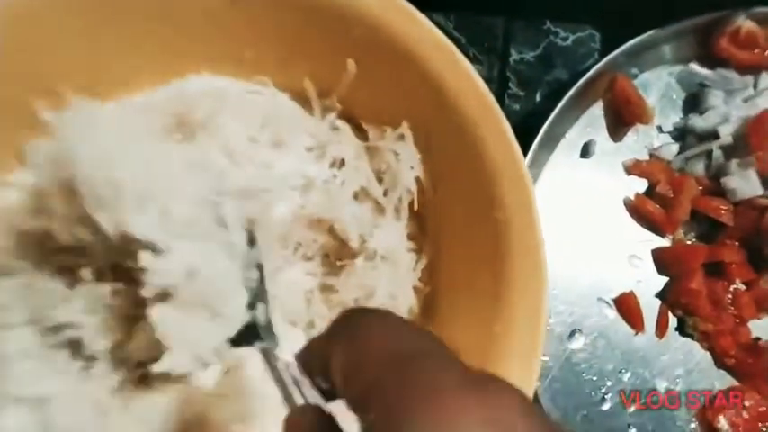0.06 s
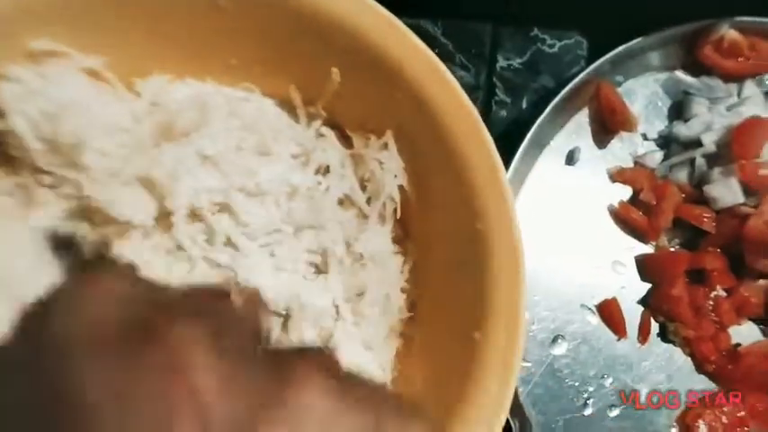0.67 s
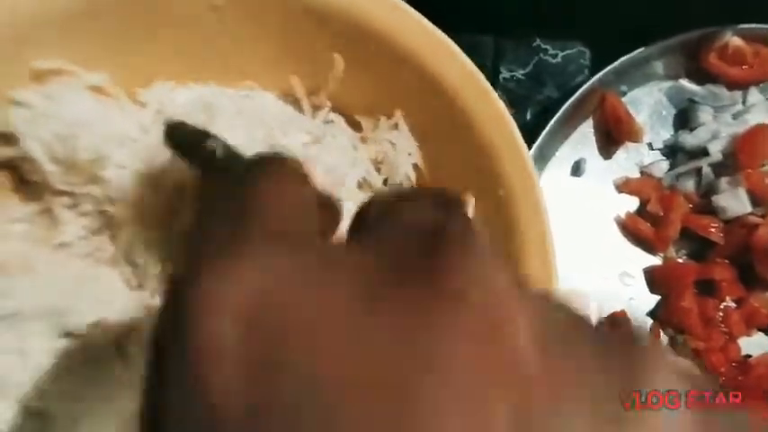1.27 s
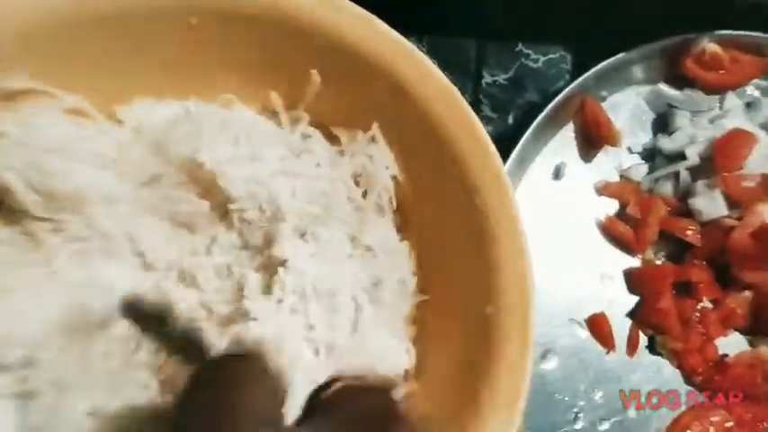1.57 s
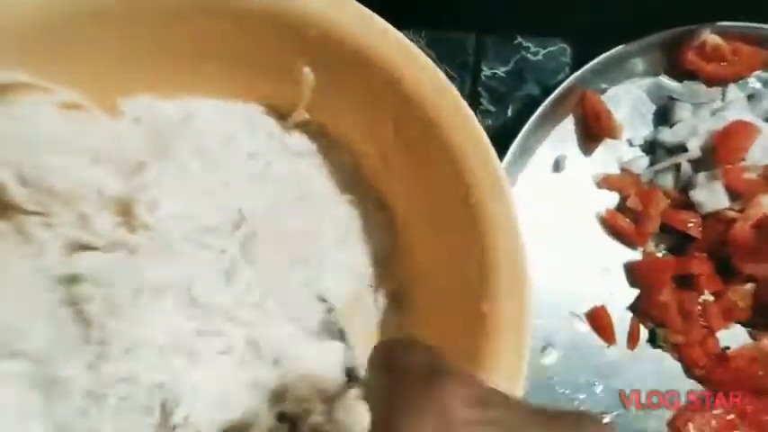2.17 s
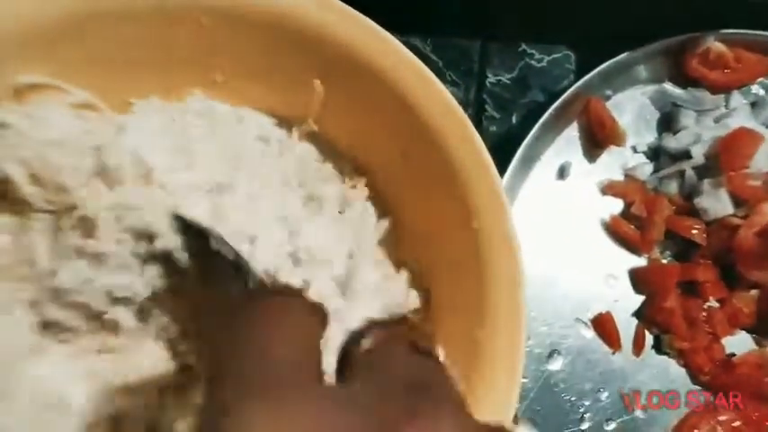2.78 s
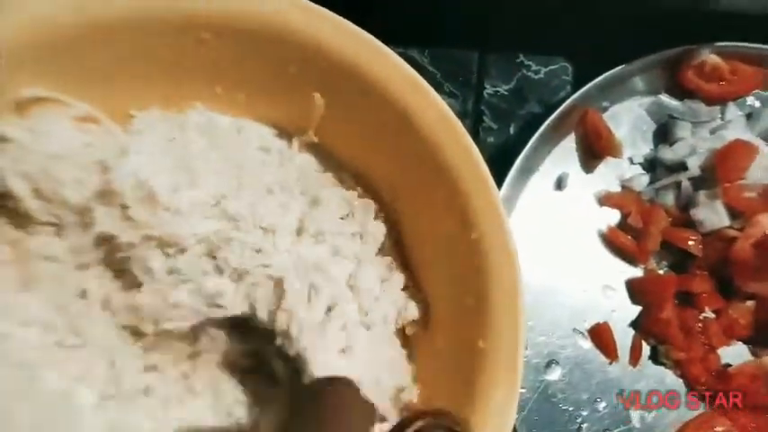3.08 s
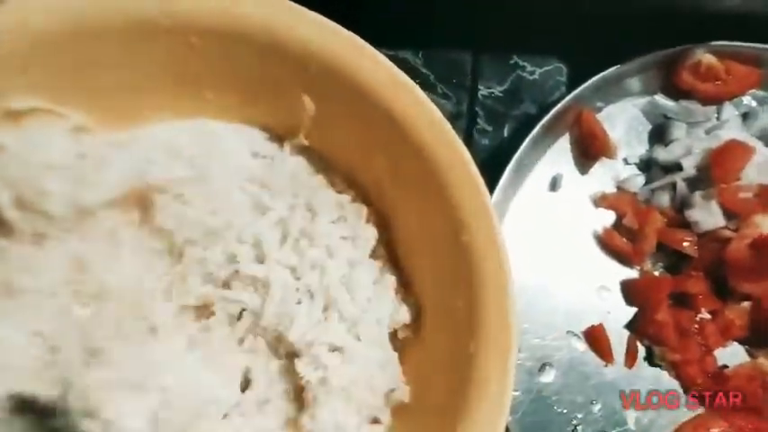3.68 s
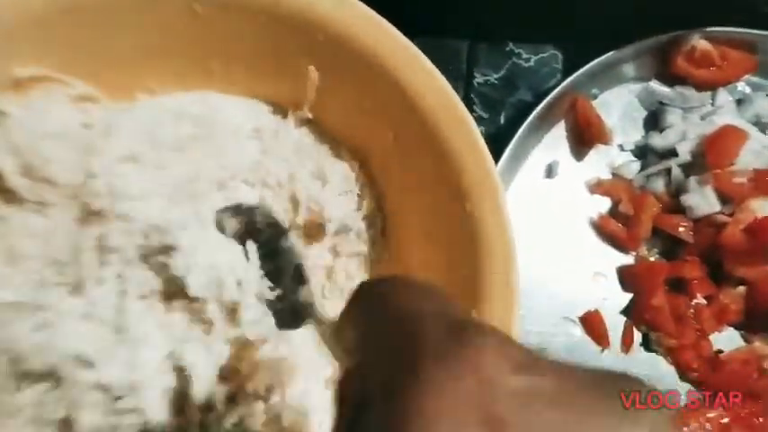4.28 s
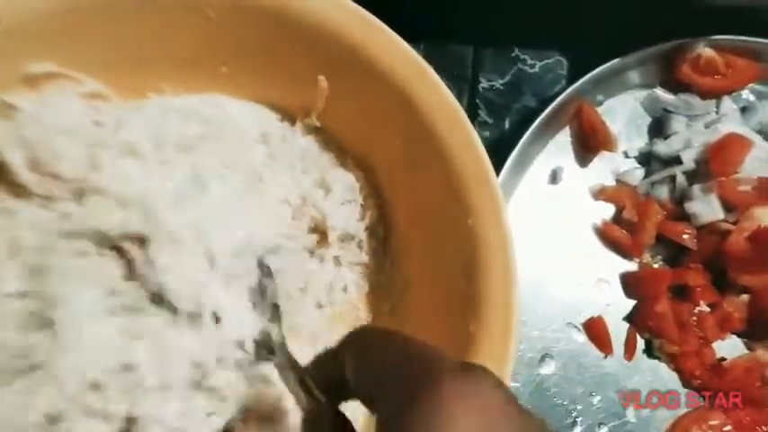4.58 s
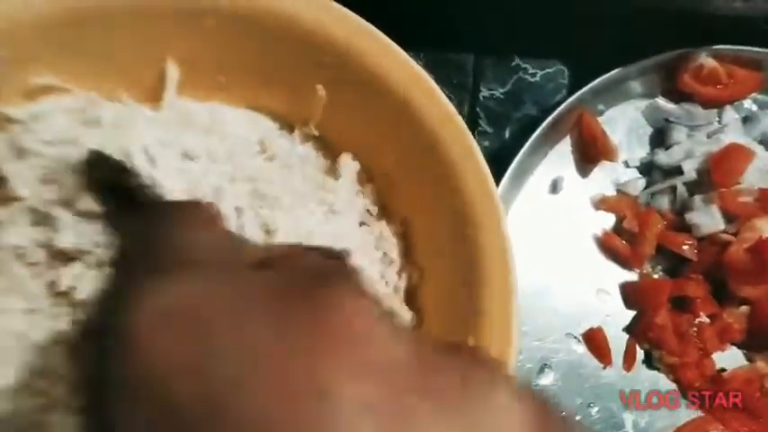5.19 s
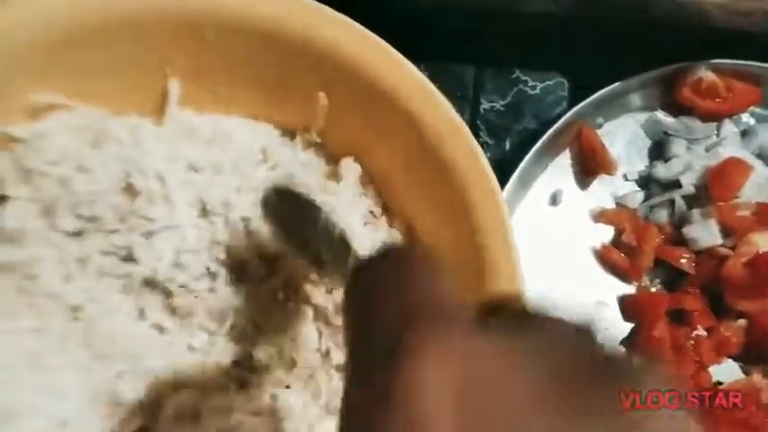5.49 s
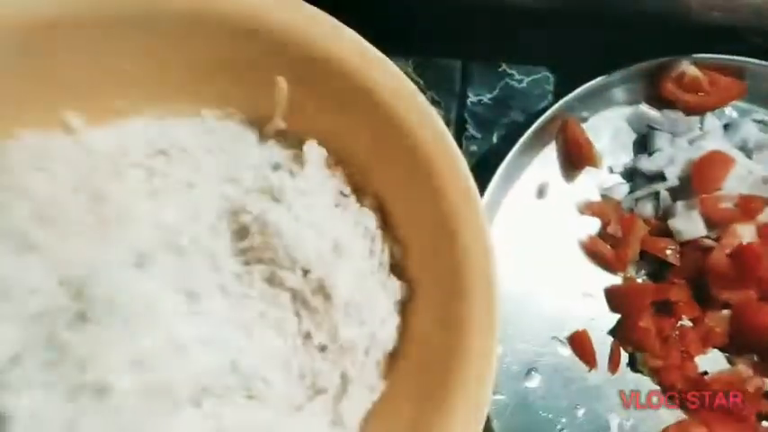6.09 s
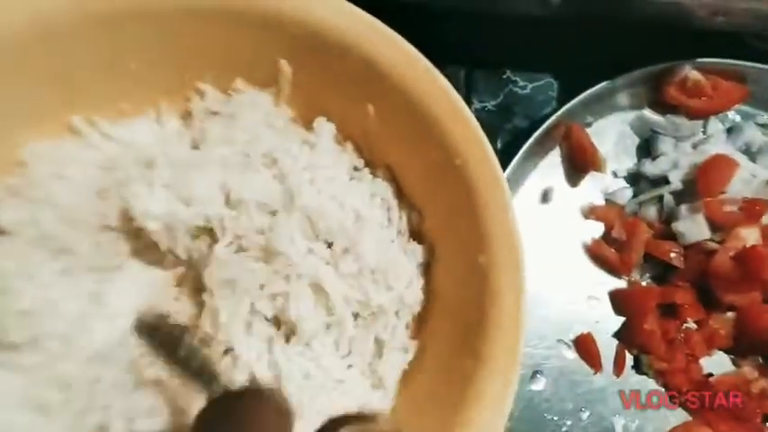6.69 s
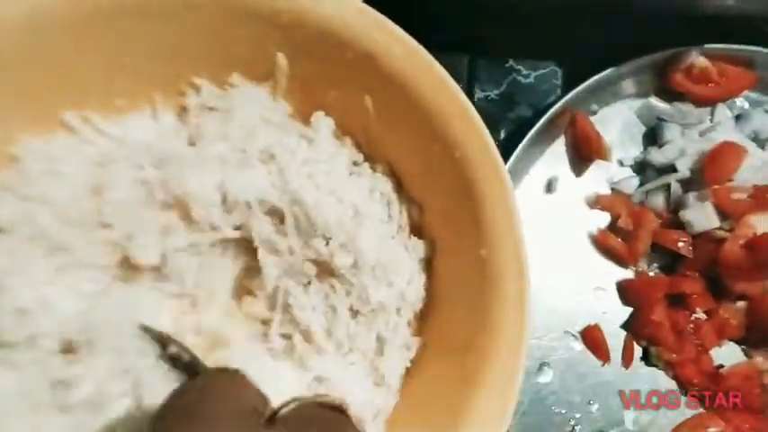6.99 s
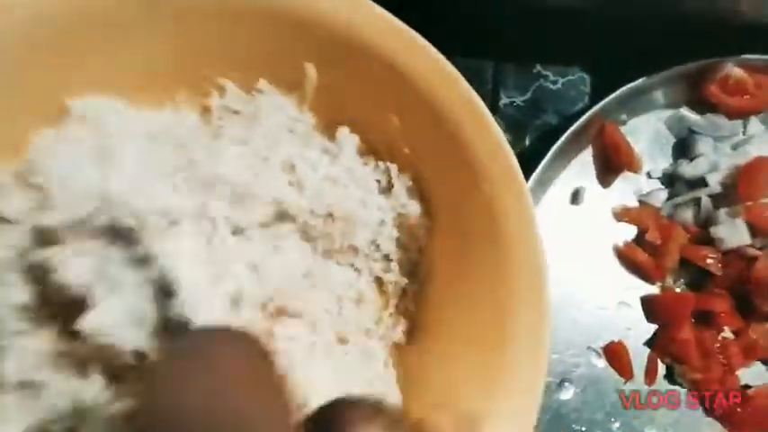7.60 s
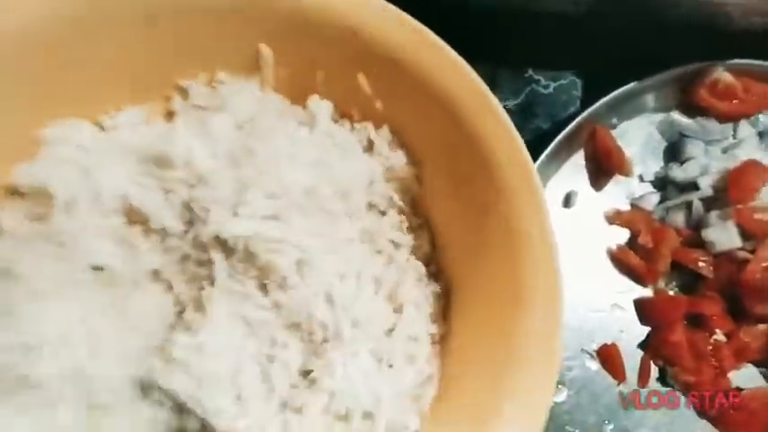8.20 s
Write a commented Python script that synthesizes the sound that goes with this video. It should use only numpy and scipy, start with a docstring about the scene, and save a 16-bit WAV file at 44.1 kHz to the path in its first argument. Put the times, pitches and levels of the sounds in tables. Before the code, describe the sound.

A steel spoon turns soft dry flakes in a plastic bowl, close to the microphone in a small kitchen. Quick, uneven strokes bring an airy rustle and a hollow scrape along the wall. Small crunches, dull bumps of the bowl and a faint patter of falling food come in between. The spoon clacks against the plastic a little after two seconds and, loudest, around seven seconds. A low room hush lies underneath.

```python
"""A small kitchen, close to the counter: a steel spoon turns soft dry flakes in a plastic bowl.
Each stroke rustles the heap and drags along the wall, both made of thousands of tiny impacts a second.
The spoon crunches into the flakes, knocks the wall into a short ring and judders once on the bottom.
The bowl bumps on the counter and spoonfuls fall back with a dull patter.
The room answers briefly over the low hush of the house."""
import sys
import numpy as np
from scipy import signal
from scipy.fft import rfft, irfft
from scipy.io import wavfile

SR = 44100
rng = np.random.default_rng(int(sys.argv[2]) if len(sys.argv) > 2 else 0)


def generate_wav(sig):
    """Save sig (samples, or channels by samples) to the path in sys.argv[1] as 16-bit PCM at SR."""
    pcm = np.round(np.clip(np.atleast_2d(sig).T, -1, 1) * 32767).astype(np.int16)
    wavfile.write(sys.argv[1], SR, pcm)


N = 367794
TIME = np.arange(N) / SR


def stroke(t, attack, hold, settle_t60, slide_db, stop_t60=0.13):
    """One push of the spoon swells, holds and stops; a share of the flakes, slide_db, slides on."""
    stopped_for = np.maximum(t - attack - hold, 0)
    share = undb(slide_db) ** 2
    stopping = (1 - share) * fade(stopped_for, stop_t60) ** 2
    sliding = share * fade(stopped_for, settle_t60) ** 2
    return np.clip(t / attack, 0, 1) ** 1.5 * np.sqrt(stopping + sliding)


# The spoon's strokes. Each row: start, attack, hold and settling t60 in seconds,
# then rustle level and drag level in dB.
SPOON_STROKES = [(0, 0.0015, 0.0055, 1.45, -43.5, -45), (0.303, 0.015, 0.021, 0.49, -54, -63),
                 (0.368, 0.11, 0.03, 1.1, -49, -61.5), (0.475, 0.062, 0.016, 0.29, -42.5, -49),
                 (0.711, 0.11, 0.059, 0.32, -49, -58), (0.852, 0.04, 0.026, 0.25, -44.5, -76),
                 (1.117, 0.11, 0.12, 0.15, -47, -52), (1.492, 0.077, 0.048, 1.34, -41, -45),
                 (1.692, 0.14, 0.0083, 0.41, -48.5, -65.5), (1.868, 0.078, 0.034, 0.78, -42, -45.0),
                 (2.245, 0.028, 0.037, 0.36, -40.5, -35), (2.46, 0.038, 0.041, 3.5, -50.5, -57.5),
                 (2.677, 0.13, 0.049, 1.15, -42.5, -43.0), (2.767, 0.16, 0.026, 1.8, -43, -57),
                 (3.104, 0.034, 0.057, 1.6, -47.5, -48.5), (3.318, 0.14, 0.069, 1.33, -41.5, -47.5),
                 (3.586, 0.15, 0.068, 0.38, -45.5, -80), (3.726, 0.15, 0.12, 2, -51, -53),
                 (4.184, 0.067, 0.056, 1.6, -44, -48), (4.533, 0.08, 0.041, 1.3, -42.5, -49),
                 (4.549, 0.16, 0.24, 2.5, -41.5, -54), (4.961, 0.18, 0.014, 0.49, -45.5, -48),
                 (5.35, 0.13, 0.015, 0.63, -42.5, -44.5), (5.749, 0.048, 0.029, 0.89, -43.5, -52.5),
                 (6.186, 0.091, 0.17, 0.37, -50, -52), (6.571, 0.072, 0.16, 2.9, -42, -48.5),
                 (7.003, 0.023, 0.023, 0.44, -50, -35), (7.282, 0.073, 0.084, 0.4, -48.5, -59.5),
                 (7.433, 0.0073, 0.0095, 0.47, -45, -38), (7.727, 0.0074, 0.15, 0.5, -50.5, -60.0),
                 (7.846, 0.14, 0.038, 1.3, -46, -49.5), (8.214, 0.061, 0.065, 0.5, -45, -50.5)]
def stirring(idle_rustle_db=-64, idle_drag_db=-73):
    """Effort in the heap and pressure on the wall in dB: strokes add in power over a faint creep."""
    t = TIME[:SR]
    heap = np.full(N, undb(idle_rustle_db) ** 2)
    wall = np.full(N, undb(idle_drag_db) ** 2)
    for start, attack, hold, t60, rustle_db, drag_db in SPOON_STROKES:
        add(heap, start, (undb(rustle_db) * stroke(t, attack, hold, t60, slide_db=-7)) ** 2)
        add(wall, start, (undb(drag_db) * stroke(t, attack, hold, 0.75 * t60, slide_db=-9)) ** 2)
    return 10 * np.log10(heap), 10 * np.log10(wall)


# The airy tone of sliding flakes. Each row: frequency in Hz, level in dB.
FLAKE_TONE = [(200, -6), (700, -10), (2400, -12.5), (3400, -7), (5000, -5), (7500, 0), (9700, -1),
              (12000, -8.5), (15500, -17)]
def rustle(effort_db, trim_db=-1, clump_db=0.44):
    """Flakes slide over each other; a faster spoon sets more of them moving, in small clumps."""
    grains_per_s = 6500 * (undb(effort_db - effort_db.max()) + 0.17)
    flakes = colour(grains(grains_per_s, scatter_db=0.5), FLAKE_TONE)
    return clumps(flakes) * undb(effort_db + trim_db + clump_db * flutter(130))


def clumps(x, depth_db=2.26, rate=28):
    """Clumps of different coarseness come and go, so each band swells and sinks on its own."""
    out = 0
    for hz in np.geomspace(1800, 11500, 6):
        band = butter(x, hz, "low", order=1)
        out = out + band * undb(depth_db * flutter(rate))
        x = x - band
    return out + x * undb(depth_db * flutter(rate))


# The mid-heavy scrape of the wall. Each row: frequency in Hz, level in dB.
SCRAPE_TONE = [(250, -11.5), (620, -9.5), (820, -3), (1250, -2.5), (1600, -2.5), (2350, -1), (2900, -3),
               (3600, -14), (5000, -7), (12000, -23)]
def drag(press_db, catch_db=0.64):
    """The spoon sticks and slips over crumbs on the plastic; the hollow note wanders as it travels."""
    slips = grains(3500, scatter_db=3) * undb(press_db + catch_db * flutter(120))
    scrape = colour(slips, SCRAPE_TONE)
    hollow_hz = 1000 * np.exp(0.088 * flutter(4.3))
    return scrape + resonance(scrape, hollow_hz, width_hz=170)


# The bright bite of the steel edge. Each row: frequency in Hz, level in dB.
STEEL_TONE = [(500, -32), (1700, -5), (2350, 6.5), (3500, 4.5), (5000, 3.5), (8500, 6.5), (11000, 1),
              (15500, -14)]
# Stabs into the heap. Each row: start in seconds, level in dB, t60 in seconds, low cut in Hz.
SPOON_STABS = [(1.009, -42, 0.29, 7800), (1.0107, -42.5, 0.011, 3220), (2.203, -32, 0.014, 2100),
               (2.207, -38.5, 0.5, 2000), (4.211, -35, 0.018, 2200), (5.7917, -33, 0.011, 2200),
               (5.8039, -27.5, 0.013, 2400), (6.581, -43.5, .08, 7500), (7.301, -22.5, 0.013, 2000),
               (7.731, -47, 0.046, 4050)]
def stabs():
    """The edge crushes flakes with a short crunch, thin and high when it only grazes the top."""
    out, t = np.zeros((2, N)), TIME[:SR // 3]
    crumbs = colour(grains(20000, scatter_db=0.65), STEEL_TONE)
    for start, db, t60, low_cut_hz in SPOON_STABS:
        crunch = crumbs[:, int(start * SR):][:, :len(t)] * undb(db) * fade(t, t60)
        add(out, start, butter(crunch, low_cut_hz, "high", order=6))
    return out


def swish(x, lag_ms=0.452, echo_gain=0.2):
    """An echo off the moving spoon and hand combs the sound, so its colour shifts within a stroke."""
    echo = []
    for channel in x:
        lag_s = lag_ms / 1000 * np.exp(0.35 * flutter(4.6))
        echo.append(np.interp(TIME - lag_s, TIME, channel))
    return x + echo_gain * butter(np.array(echo), 1050, "high")


# The ring of the plastic wall. Each row: mode frequency in Hz, level in dB, t60 in seconds.
WALL_MODES = [(563, -6.5, 0.031), (798, -27, 0.28), (814, 2, 0.019), (872, -23, 0.36), (943, -22, 0.23),
              (975, -2.5, 0.039), (1275, 0.5, 0.02), (1730, -7, 0.011), (2100, -2, 0.028),
              (2350, -13, 0.024), (2713, -14, 0.059)]
# Knocks on the wall. Each row: start in seconds, level in dB, click offset in dB, favoured pitch in Hz.
SPOON_KNOCKS = [(1.3515, -53, 5, 2210), (2.2605, -27.5, 0, 900), (2.2765, -24, -5, 2300),
                (2.2867, -17.5, -16, 1400), (2.2952, -18, -14, 1700), (3.1455, -28.5, -4, 840),
                (3.16, -29.5, -8, 1520), (5.2805, -34.5, -20, 720), (5.447, -29, -14, 1050),
                (7.0145, -5, -9, 1240), (7.0167, -4, -13, 1390), (7.03, -5.5, -20, 950),
                (7.0405, -10.5, -14, 2100), (7.058, -18.5, -16, 1100), (7.4413, -15, -3.5, 1010),
                (7.4553, -14.5, -12, 2400), (7.694, -45.5, -5.5, 896)]
def knocks(ring_db=-7, click_db=-10, click_t60=0.031, falloff_db_per_octave=6):
    """Steel meets plastic: the struck spot favours some modes of the wall, and trapped crumbs crack."""
    t = TIME[:SR // 3]
    body, cracks = np.zeros((2, N)), np.zeros((2, N))
    for start, db, click_offset_db, spot_hz in SPOON_KNOCKS:
        modes = [(hz, mode_db - falloff_db_per_octave * abs(np.log2(hz / spot_hz)), t60)
                 for hz, mode_db, t60 in WALL_MODES]
        add(body, start, undb(db + ring_db) * spread([ring(modes, t), ring(modes, t) / 2]))
        crack = fade(t, click_t60) * stereo_noise(len(t)) / 2
        add(cracks, start, undb(db + click_offset_db + click_db) * crack)
    body = butter(body, 586, "high", order=4)
    return butter(body, 2800, "low", order=4) + colour(cracks, STEEL_TONE)


# The thud of the loaded bowl. Each row: mode frequency in Hz, level in dB, t60 in seconds.
BOWL_MODES = [(84.6, -15.5, 0.67), (146.5, -12.5, 0.49), (257, 0, 0.071), (322, -7.5, 0.11),
              (586, -10.5, 0.091), (734, -14, 0.14), (900, 2.5, 0.033), (961, -7.5, 0.051)]
# Bumps on the counter. Each row: start in seconds, level in dB, hardness as a high cut in Hz.
BOWL_BUMPS = [(0.026, -34, 900), (0.332, -48, 1400), (2.002, -36, 900), (2.203, -46.5, 1300),
              (2.321, -33, 1010), (3.256, -44, 1150), (4.329, -32.5, 1600), (4.337, -35, 1400),
              (4.568, -49, 1100), (4.629, -48.5, 2200), (5.237, -45.5, 1800), (5.792, -35, 1000),
              (5.807, -44, 1200), (5.838, -38, 372), (6.685, -35, 280), (6.756, -37.5, 650),
              (7.5, -35, 560)]
def bumps(trim_db=-1):
    """The bowl rocks and lands; a softer landing leaves only its low modes."""
    out = np.zeros((2, N))
    for start, db, high_cut_hz in BOWL_BUMPS:
        thud = ring(BOWL_MODES, TIME[:SR], detune=0.063)
        add(out, start, undb(db + trim_db) * butter(thud, high_cut_hz, "low"))
    return butter(butter(out, 1950, "low", order=4), 67, "high")


# One judder along the bottom: middle and half length in seconds, level in dB.
SPOON_JUDDER = (5.3, 0.029, -40.5)
def judder():
    """The spoon, pressed through the food, slips in quick dull jerks that shake the bottom."""
    middle, half_length, db = SPOON_JUDDER
    body = ring(BOWL_MODES, TIME[:SR])
    swell = undb(db) * np.exp(-((TIME - middle) / half_length) ** 4)
    jerks = grains(300, scatter_db=0.86) * swell
    return butter(convolve(jerks, body / np.linalg.norm(body)), 390, "high")


# Spoonfuls falling back. Each row: middle and half length in seconds, level in dB.
FALLING_SPOONFULS = [(1.634, 0.079, -46.5), (2.88, 0.35, -56), (3.81, 0.039, -51), (4.608, 0.032, -45),
                     (4.83, 0.13, -47), (6.78, 0.071, -42)]
def falls(makeup_db=14, dull_hz=260):
    """Soft clumps land on the heap and drum faintly on the bottom."""
    flow = sum(undb(db) * np.exp(-((TIME - middle) / half_length) ** 2 / 2)
               for middle, half_length, db in FALLING_SPOONFULS)
    patter = butter(grains(400, scatter_db=1.7) * flow, dull_hz, "low")
    return undb(makeup_db) * butter(patter, 63, "high")


def kitchen(x, near_db=-11, near_t60=0.063, far_db=-19, low_t60=0.45, high_t60=0.24, split_hz=1500):
    """Quick reflections from bowl and counter, then the room, which holds the bass longest."""
    t = TIME[:SR]
    near = stereo_noise(SR) * fade(t, near_t60) / np.linalg.norm(fade(t, near_t60))
    diffuse = stereo_noise(SR)
    boom = undb(6) * butter(diffuse, 640, "low")
    low_tail = (butter(diffuse, split_hz, "low") + boom) * fade(t, low_t60)
    high_tail = butter(diffuse, split_hz, "high") * fade(t, high_t60) / 2
    far = (low_tail + high_tail) / np.linalg.norm(fade(t, low_t60))
    reflections = (t > 0.002) * (undb(near_db) * near + undb(far_db) * far)  # 2 ms pre-delay
    return x + convolve(x, reflections)


# The room tone. Each row: frequency in Hz, level in dB.
ROOM_TONE = [(30, -38), (45, 1.5), (88, 7.5), (155, -0.5), (230, -7.5), (350, -3.5), (900, -22.5),
             (3000, -34), (8000, -65), (15000, -34)]
def hush(db=-58.5):
    """The low steady noise of the house."""
    return colour(stereo_noise(N), ROOM_TONE) * undb(db)


def grains(rate, scatter_db):
    """Random tiny impacts of unequal size, rate a second; the density does not change the power."""
    hits = rng.random((2, N)) < rate / SR
    signs = rng.choice([-1, 1], (2, N))
    sizes = undb(scatter_db * np.clip(rng.standard_normal((2, N)), -2, 2))
    clicks = hits * signs * sizes / np.sqrt(rate)
    return spread(clicks / clicks.std())


def ring(modes, t, detune=0.0118):
    """Decaying modes of a struck body; each blow lands elsewhere, varying level, pitch and polarity."""
    drops_db, shifts, polarities = 2 * rng.random((3, len(modes))) - 1
    out = 0
    for (hz, db, t60), drop_db, shift, polarity in zip(modes, drops_db, shifts, polarities):
        tone = np.sign(polarity) * np.sin(2 * np.pi * hz * (1 + detune * shift) * t)
        out = out + undb(db - drop_db) * fade(t, t60) * tone
    return out


def resonance(x, hz, width_hz):
    """A resonance whose centre moves; gain 1 at the centre."""
    turn = np.exp(2j * np.pi * np.cumsum(hz) / SR)
    pole = np.exp(-np.pi * width_hz / SR)
    return 2 * np.real(turn * signal.lfilter([1 - pole], [1, -pole], x / turn))


def flutter(rate):
    """Smooth random wander with a spread near 1, through rate points a second."""
    return np.interp(TIME * rate, np.arange(N), rng.standard_normal(N))


def spread(pair, apart_hz=1900, bass_share=0.29):
    """Two unrelated signals as mid and side: narrow in the bass, wide in the treble."""
    side = butter(pair[1], apart_hz, "high") + bass_share * pair[1]
    return np.array([pair[0] + side, pair[0] - side])


def stereo_noise(samples):
    """Noise that widens towards the treble."""
    return spread(rng.standard_normal((2, samples)))


def colour(x, tone, size=4096):
    """Minimum-phase EQ with the given tone; white noise keeps its power."""
    cepstrum = irfft(np.log(gains(tone, np.fft.rfftfreq(size, 1 / SR))))
    cepstrum[1:size // 2] *= 2
    cepstrum[size // 2 + 1:] = 0
    response = irfft(np.exp(rfft(cepstrum)))
    return convolve(x, response / np.linalg.norm(response))


def gains(tone, hz):
    """Gain of a (Hz, dB) curve at the given frequencies."""
    points_hz, db = np.transpose(tone)
    return undb(np.interp(np.log(hz + 1), np.log(points_hz), db))


def butter(x, hz, kind, order=2):
    """Low-pass or high-pass."""
    return signal.sosfilt(signal.butter(order, hz, kind, fs=SR, output="sos"), x)


def convolve(x, response):
    """Pass each channel through a response."""
    return signal.fftconvolve(np.atleast_2d(x), np.atleast_2d(response), axes=1)[:, :N]


def fade(t, t60):
    """Exponential decay, 60 dB down after t60."""
    return np.exp(-np.log(1000) * t / t60)


def undb(db):
    """Decibels to gain."""
    return 10 ** (np.asarray(db) / 20)


def add(track, start_s, sound):
    """Mix a sound in at a time."""
    start = int(start_s * SR)
    part = sound[..., :N - start]
    track[..., start:start + part.shape[-1]] += part


def scene():
    """Spoon, flakes and bowl in the kitchen, over the room tone."""
    effort_db, press_db = stirring()
    food = swish(rustle(effort_db) + drag(press_db) + stabs())
    return kitchen(food + knocks() + bumps() + judder() + falls()) + hush()


# The lean to the left, strongest in the treble. Each row: frequency in Hz, left minus right in dB.
LEFT_LEAN = [(300, 2), (1300, 5), (4400, 4), (8000, 13.5), (15000, 1)]
def record(dry, ceiling=0.9, low_cut_hz=39, high_cut_hz=15800):
    """A phone, left microphone facing the bowl, right one shaded, rounds peaks and trims both extremes."""
    lean = gains(LEFT_LEAN, np.fft.rfftfreq(N, 1 / SR))
    balance = 2 * np.array([lean, np.ones_like(lean)]) / (1 + lean)
    heard = irfft(rfft(dry) * balance, N)
    heard = ceiling * np.tanh(heard / ceiling)
    heard = butter(heard, low_cut_hz, "high", order=8)
    return signal.sosfilt(signal.ellip(10, 0.2, 70, high_cut_hz, fs=SR, output="sos"), heard)


dry = scene()
out = record(dry)
generate_wav(out)
```